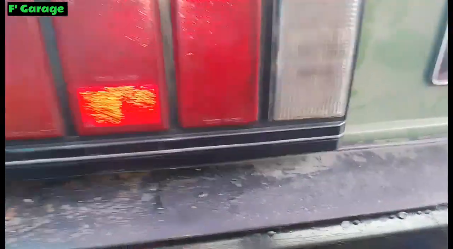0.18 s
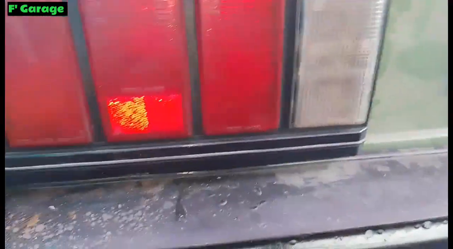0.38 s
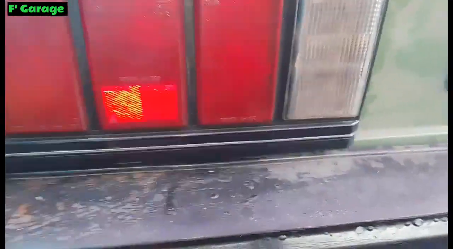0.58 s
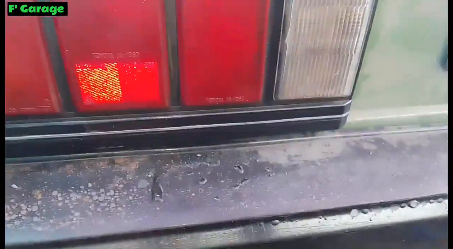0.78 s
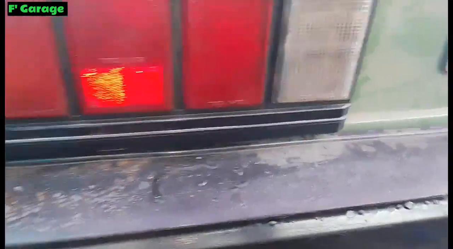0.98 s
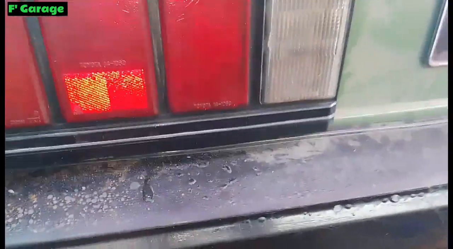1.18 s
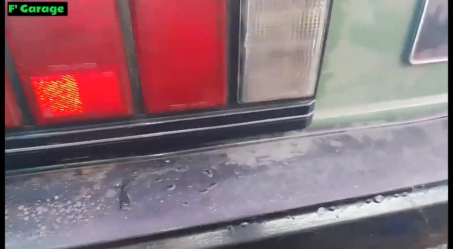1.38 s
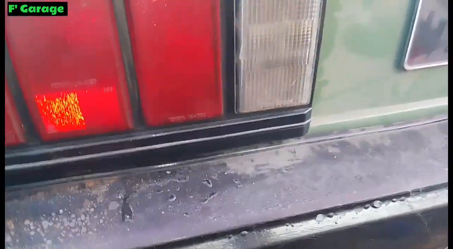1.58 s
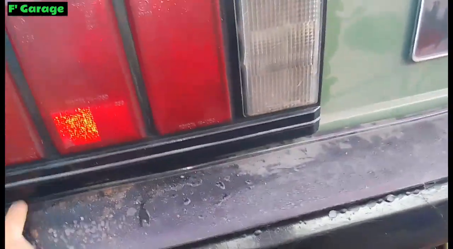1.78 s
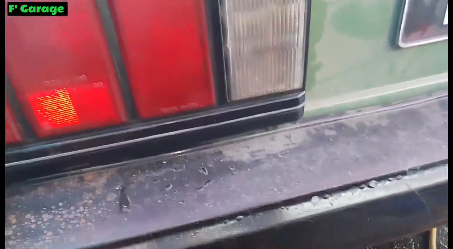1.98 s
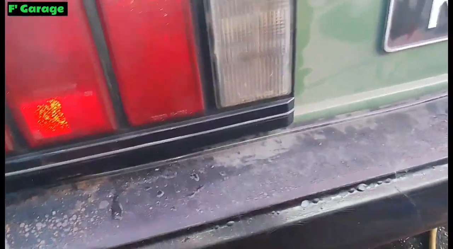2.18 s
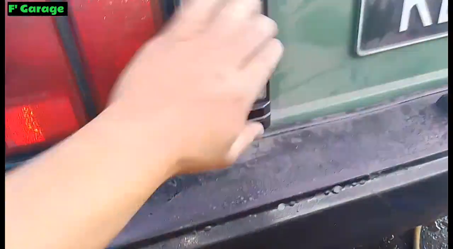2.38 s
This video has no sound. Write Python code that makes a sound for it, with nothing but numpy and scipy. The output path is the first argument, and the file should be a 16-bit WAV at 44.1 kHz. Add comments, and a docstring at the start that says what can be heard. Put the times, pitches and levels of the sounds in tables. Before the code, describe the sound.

A hand knocks loose plastic tail-light lenses on a car, giving sharp hollow clacks with brief rattles and dull panel thuds, in uneven clusters, then a pause and a final flurry; close phone microphone, small garage.

```python
"""Knocks on loose plastic lamps

Loose plastic lamp lenses and trim are knocked close to a phone in a garage. Each knock is a burst of
noise for the blow and a short swell of clicks and grit for the rattle, ringing housing, lens and ribs.
Jolts and uneven pushes boom the panel behind. The walls answer with decaying noise bands, over a low
outdoor murmur of slowly wavering noise. The phone limits the loudest knocks.
"""
import sys
import numpy as np
from scipy import signal
from scipy.fft import rfft, irfft
from scipy.io import wavfile
from scipy.ndimage import uniform_filter1d, minimum_filter1d

SR = 44100
rng = np.random.default_rng(int(sys.argv[2]) if len(sys.argv) > 2 else 0)


def wrap_up_sound(samples):
    """Save the sound to the file named by the first command line argument, as 16-bit audio."""
    columns = np.atleast_2d(samples).T
    # keep every value between -1 and 1, then stretch to whole-number steps
    tamed = np.clip(columns, -1, 1)
    steps = np.round(tamed * 32767).astype(np.int16)
    wavfile.write(sys.argv[1], SR, steps)


def voltage_ratio(level):
    """Linear amplitude factor for a level in decibels (scalar or array-like)."""
    return 10 ** (np.asarray(level, float) / 20)


N = 108045

# Knocks on the lamps; levels are relative, boom (housing) and crack (ribs) against the lens:
# start_s, level_db, boom_db, crack_db, rattle_s
KNOCK_EVENTS = [(0.014, -57, 1, 11, 0.006), (0.048, -24.5, -5.5, -10, 0.014),
                (0.0765, -28, -1.5, -8.5, 0.0091), (0.091, -39, 10, -12, 0.016),
                (0.1886, -21.5, -7, -11, 0.014), (0.213, -32, -7, -2, 0.014), (.224, -22.5, 2, -14, 0.0089),
                (0.231, -14, -6, -6.5, 0.015), (0.2434, 6.5, -7.5, -3.5, 0.022),
                (0.2793, -6, -0.5, 2, 0.0095), (0.305, -13, -21, -16, 0.016),
                (0.353, -14.5, -5, -4, 0.0078), (0.361, -13.5, 0, -6.5, 0.02),
                (0.3951, -17.5, -3.5, 2.5, 0.0052), (0.509, -35, 3, -17, 0.0053),
                (0.516, -34, 0, -11, 0.012), (0.5515, -11.5, -6.5, -8.5, 0.0098),
                (0.5814, 2.5, -3, -1.5, 0.0074), (0.6094, -15, 8, 4.5, 0.0041),
                (0.6784, -8.5, 2.5, 0.5, 0.012), (.683, -0.5, -3.5, 3.5, 0.015),
                (0.725, -15.5, -2, -5, 0.0041), (0.738, -30, 1, -9, .01), (0.9393, -12.5, -4, 3, 0.012),
                (0.953, -12.5, -15, -14, 0.0021), (0.959, -15.5, 0.5, -4.5, 0.0018),
                (0.9666, -12, -16.5, -5.5, 0.0071), (1.008, -44, 12, 2, 0.0091),
                (1.038, -34, -8, -13, 0.0045), (1.052, -15.5, -5, -2.5, 0.013),
                (1.072, -21.5, 1, 1.5, 0.0025), (1.079, -19, 3.5, -3, 0.01), (1.094, -14, -2, -7, 0.0068),
                (1.1152, -16, -6.5, -1.5, 0.005), (1.234, -24, -3, -6.5, 0.0092),
                (1.2515, -10, -7, 0, 0.011), (1.262, -8, -8, -5, 0.052), (1.309, 0.5, -11, -1, 0.015),
                (1.3587, -18.5, -4, -3.5, 0.0073), (1.387, -6.5, -6.5, -3, 0.0052),
                (1.3955, 0.5, -3, 2, 0.015), (1.423, -11.5, 1.5, -16, 0.014), (1.477, -31.5, 8, -6, 0.0071),
                (1.592, -36, -5, -11, 0.014), (1.823, -35, -0.5, -6, 0.018), (1.848, -36.5, -9, 2.5, 0.033),
                (2.099, -33, 7.5, -6.5, 0.0069), (2.12, -28.5, 2, 0, 0.0023), (2.152, -8, -10, -1.5, 0.015),
                (2.1627, -13.5, 1, 8, 0.0073), (2.176, -9.5, -5, -16, 0.011), (2.1884, -17, 0, 4, 0.0043)]
# Modes of the hollow lamp housing: pitch_hz, relative level_db, t60_s
HOUSING_MODES = [(465, -1, 0.033), (566, 1, 0.099), (628.5, 3.5, 0.039), (749, 3.5, 0.034),
                 (809.3, 4.5, 0.072), (951, 4.5, 0.016), (1055, -1, 0.063), (1164, -5.5, 0.045)]
# Middle modes of the lens: pitch_hz, relative level_db, t60_s
LENS_MODES = [(1274.4, -8.5, 0.016), (1457, -4, 0.038), (1688, -0.5, 0.017), (1864, 0, 0.035),
              (1950, 0.5, 0.046), (2107, 2, 0.029), (2274, -1.5, 0.0099), (2720, -7.5, 0.012),
              (2905, -9.5, 0.038), (3228, -7, 0.0074)]
# Modes of the lens ribs and clips: pitch_hz, relative level_db, t60_s
RIB_MODES = [(3877, -2, 0.011), (4197, -5.5, 0.037), (4600, 1, 0.0084), (5010, 1.5, 0.023),
             (5267, -0.5, 0.013), (5710, 1, 0.014), (6100, 0, 0.005), (6766, -4, 0.014),
             (6890, -5.5, 0.012), (7790, -6.5, 0.002), (8880, -11, .003), (10100, -13, .002),
             (11960, -16.5, 0.0024), (14700, -20.5, 0.0014)]
# Thuds of the panel behind the lamps: start_s, relative level_db, favoured pitch_hz, push_s
THUD_EVENTS = [(0.009, -33, 61.9, 0.025), (0.053, -24.5, 339, 0.036), (0.093, -23.5, 166, 0.0059),
               (0.186, -28, 96.9, 0.029), (0.21, -18.5, 420, 0.042), (0.247, -6, 64.6, 0.008),
               (0.277, -14.5, 171, 0.023), (0.349, -18.5, 318, 0.032), (0.394, -17.5, 133, 0.017),
               (0.508, -26, 182, 0.017), (0.567, -18.5, 200, 0.015), (0.588, -13.5, 182, 0.021),
               (0.62, -20.5, 161, 0.045), (0.679, -20.5, 61.9, 0.018), (0.702, -8, 348, 0.01),
               (0.742, -18, 345, 0.012), (0.94, -9, 350, 0.005), (0.974, -20.5, 330, 0.014),
               (1.02, -30, 301, 0.017), (1.051, -15, 225, 0.012), (1.076, -20.5, 286, 0.039),
               (1.109, -29.5, 290, 0.018), (1.236, -21.5, 385, 0.022), (1.263, -14, 306, 0.022),
               (1.299, -9, 165, 0.02), (1.356, -20.5, 328, 0.032), (1.393, -16.5, 367, 0.025),
               (1.42, -12.5, 125, 0.01), (1.825, -40.5, 420, 0.0079), (2.096, -18, 230, 0.0086),
               (2.15, -13.5, 420, 0.017), (2.185, -15.5, 383, 0.02)]
# Modes of the sheet-metal panel: pitch_hz, relative level_db, t60_s
PANEL_MODES = [(37.7, -8, 0.32), (66.6, -5, 0.45), (99, -6, 0.2), (123.7, -6, 0.22), (159, -3, 0.13),
               (208, -4, 0.095), (240.5, -3.5, 0.29), (275, -3, 0.084), (337.5, 1, 0.06), (398.5, 0, 0.023)]
# Echo of the walls: pitch_hz, relative level_db (per Hz), t60_s
WALL_ECHO = [(60, 4.5, 0.43), (298, 2, 0.46), (990, 4, 0.27), (3030, 2, 0.32), (6050, -1.5, 0.3),
             (9250, -1, 0.24), (14100, 3, 0.21)]
# Spectrum of the murmur as the microphone colours it: pitch_hz, relative level_db (per Hz)
MURMUR_SPECTRUM = [(15, -27), (25, -4.5), (53, -12), (120, -18.5), (194, -21.5), (324, -23), (542, -27.5),
                   (1060, -30.5), (1220, -42.5), (1590, -26), (2330, -32.5), (2970, -40.5), (3220, -35),
                   (5670, -28.5), (8970, -54.5), (14200, -54.5), (15800, -60)]


def unit(x):
    """Scale to rms 1."""
    return x / np.sqrt(np.mean(x ** 2))


def unit_energy(h):
    """Scale an impulse response to energy 1."""
    return h / np.sqrt(np.sum(h ** 2))


def ring(modes):
    """A struck body: decaying sines of alternating polarity, level_db setting each mode's energy."""
    t = np.arange(SR // 3)[:, None] / SR
    hz, level_db, t60 = np.array(modes).T
    t60 = np.maximum(t60, 0.001)
    wave = np.sin(2 * np.pi * hz * t) * (-1.0) ** np.arange(len(hz))
    decay = np.exp(-np.log(1000) * t / t60)
    h = (voltage_ratio(level_db) / np.sqrt(t60) * decay * wave).sum(axis=1)
    return unit_energy(h)


def bands(length, lowest_hz=27.27):
    """Unrelated noises in overlapping third-octave bands, as (centre Hz, signal of density 1)."""
    f = np.fft.rfftfreq(length, 1 / SR) + 1  # + 1 avoids log of zero
    for hz in lowest_hz * 2 ** (np.arange(28) / 3):
        shape = np.cos(np.pi / 2 * np.clip(3 * np.log2(f / hz), -1, 1))
        yield hz, irfft(rfft(rng.standard_normal(length)) * shape, length)


def walk(rate):
    """Random levels, rate of them a second, slewed into one another; spread near 1."""
    hold = int(SR / rate)
    steps = np.repeat(rng.standard_normal(N // hold + 1), hold)
    return 1.3 * uniform_filter1d(uniform_filter1d(steps, hold), hold)[:N]


def contacts():
    """Uneven clicks of a part chattering in its seat, at the same moments in all three bodies; rms 1."""
    rate_per_s, spread_db = 2200, 2.8
    chance, luck = rng.random((2, N))
    size = (chance < rate_per_s / SR) * voltage_ratio(-spread_db * np.log(luck + 1e-9))
    return unit(size * np.sign(rng.standard_normal((3, N))))


def knocks():
    """A sharp blow, softer before long rattles, then a rattle that swells, holds and settles."""
    level_db, blow_db, rattle_db = -5.5, 14, -9
    blow_s, settle_s = 0.001, 0.0084  # decay constants
    soft_s = 0.012  # a rattle this long halves the blow
    rise_share = 0.15  # rise time constant, share of the rattle length
    grit_share = 0.6  # steady noise added to the clicks
    t = np.arange(N) / SR
    rattle_power, blows = np.zeros((2, 3, N))  # rows: housing, lens, ribs
    for start_s, db, boom_db, crack_db, rattle_s in KNOCK_EVENTS:
        i = int(start_s * SR)
        span = slice(i, i + SR // 5)
        age = np.maximum(t[span] - start_s, 0)
        rise = 1 - np.exp(-age / (rise_share * rattle_s))
        settle = np.exp(-np.maximum(age - rattle_s, 0) / settle_s)
        gain = voltage_ratio([[db + boom_db], [db], [db + crack_db]])
        rattle_power[:, span] += (gain * rise * settle) ** 2
        blows[:, span] += gain * np.exp(-age / blow_s) / (1 + (rattle_s / soft_s) ** 2)
    chatter = contacts() + grit_share * rng.standard_normal((3, N))
    force = np.sqrt(rattle_power) * voltage_ratio(rattle_db) * chatter
    force += voltage_ratio(blow_db) * blows * np.sign(rng.standard_normal((3, N)))
    bodies = ring(HOUSING_MODES), ring(LENS_MODES), ring(RIB_MODES)
    return voltage_ratio(level_db) * sum(signal.fftconvolve(f, h)[:N] for f, h in zip(force, bodies))


def thuds():
    """A jolt and a fading uneven push shake the panel; the spot struck favours the modes near one pitch."""
    level_db, jolt_db, favour_db_per_octave = -6.5, 20, 6.5
    out = np.zeros(N + SR)
    age = np.arange(SR // 10) / SR
    for start_s, db, near_hz, push_s in THUD_EVENTS:
        force = rng.standard_normal(len(age)) * np.exp(-0.5 * (age / push_s) ** 2)
        force[0] = voltage_ratio(jolt_db)
        modes = []
        for hz, mode_db, t60 in PANEL_MODES:
            octaves_off = abs(np.log2(hz / near_hz))
            modes.append((hz, mode_db - favour_db_per_octave * octaves_off, t60))
        sound = voltage_ratio(db + level_db) * signal.fftconvolve(force, ring(modes))
        i = int(start_s * SR)
        out[i:i + len(sound)] += sound
    return out[:N]


def microphone(x):
    """The phone's microphone rolls off the deep bass and the highest treble."""
    low_hz, high_hz = 29, 14000
    return signal.sosfilt(signal.butter(2, [low_hz, high_hz], "band", fs=SR, output="sos"), x)


def walls(x):
    """Dense echoes of a small garage: noise bands that build up fast, the lows lasting longest."""
    level_db, build_up_s = -14.5, 0.0027
    t = np.arange(SR // 2) / SR
    hz, band_db, t60 = np.array(WALL_ECHO).T
    h = np.zeros(len(t))
    for centre, band in bands(len(t)):
        gain = voltage_ratio(np.interp(np.log(centre), np.log(hz), band_db))
        band_t60 = np.interp(np.log(centre), np.log(hz), t60)
        h += band * gain * np.exp(-np.log(1000) * t / band_t60)
    h *= 1 - np.exp(-(t / build_up_s) ** 2)
    return voltage_ratio(level_db) * signal.fftconvolve(x, unit_energy(h))[:N]


def murmur():
    """Distant outdoor noise; its bands swell together and flicker alone."""
    level_db, swell_db, flicker_db = -45, 1.0, 1.5
    hz, band_db = np.array(MURMUR_SPECTRUM).T
    swell = swell_db * walk(6.09)
    out = np.zeros(N)
    for centre, band in bands(N):
        colour = np.interp(np.log(centre), np.log(hz), band_db)
        out += band * voltage_ratio(colour + swell + flicker_db * walk(12))
    return unit(out) * voltage_ratio(level_db)


def scene():
    """Knocks and thuds through the microphone, their echoes and the murmur."""
    near = microphone(knocks() + thuds())
    return (near + walls(near) + murmur())[None]


def low_pass(x):
    """Removes everything above the highest recorded frequency."""
    return signal.sosfilt(signal.butter(12, 16480, fs=SR, output="sos"), x)


def record(dry):
    """A very fast limiter holds the peaks flat; the phone cuts the top and sits slightly off zero."""
    ceiling, hardness = 0.77, 6.0  # ceiling as share of full scale, ahead of the top cut
    look_s, top_hz, offset = 0.0006, 15300, 0.0048
    look = int(look_s * SR)
    # the 0.5 lifts quiet sound by 1 dB
    need = (0.5 + np.abs(dry / ceiling) ** hardness) ** (-1 / hardness)
    gain = uniform_filter1d(minimum_filter1d(need, look), look)
    cut = signal.sosfilt(signal.butter(8, top_hz, fs=SR, output="sos"), dry * gain)
    return low_pass(cut + offset)


dry = scene()
out = record(dry)
wrap_up_sound(out)
```